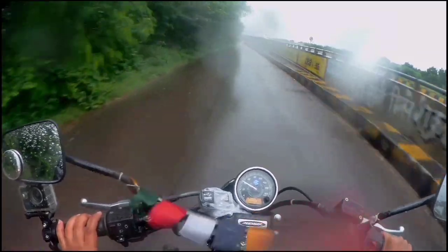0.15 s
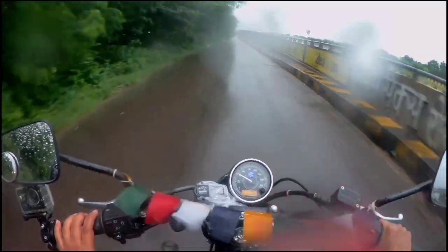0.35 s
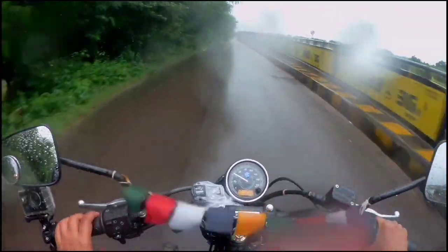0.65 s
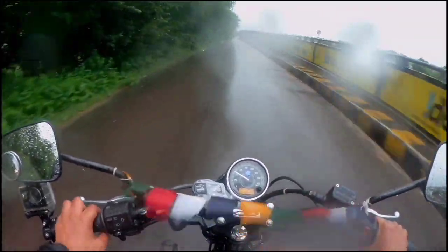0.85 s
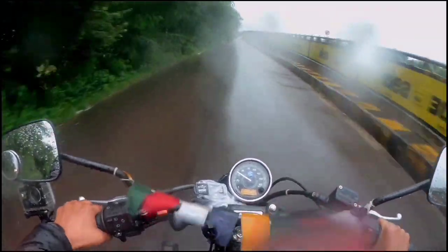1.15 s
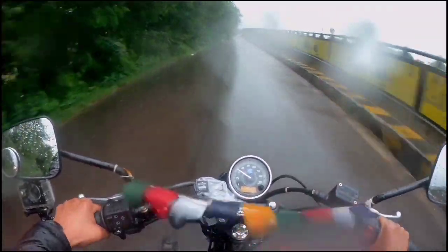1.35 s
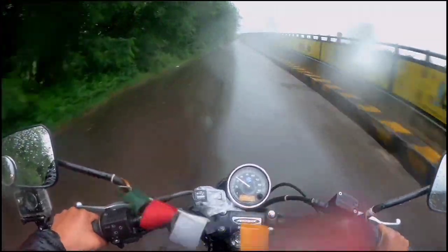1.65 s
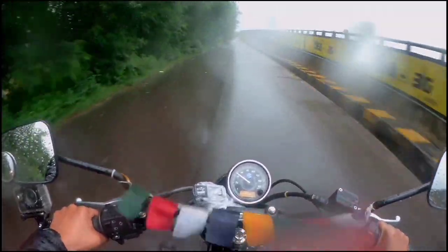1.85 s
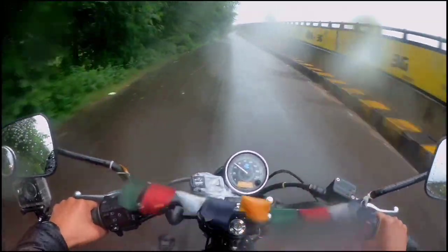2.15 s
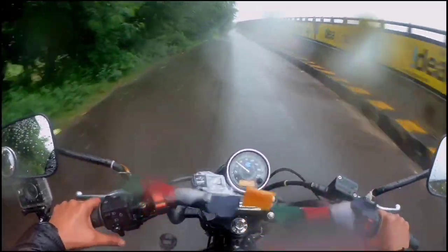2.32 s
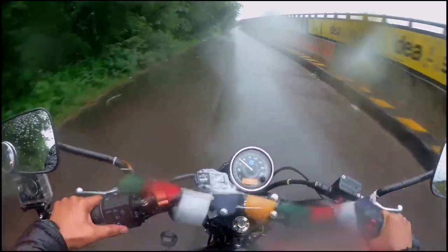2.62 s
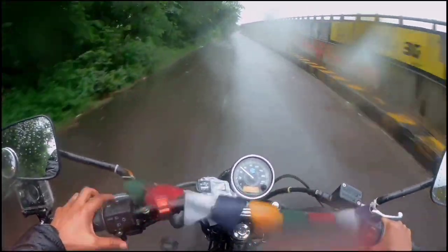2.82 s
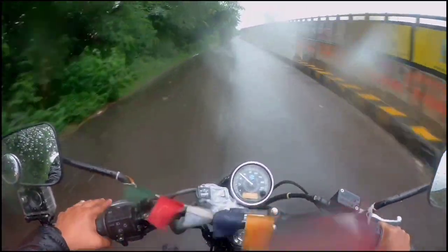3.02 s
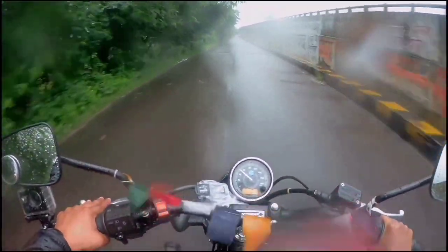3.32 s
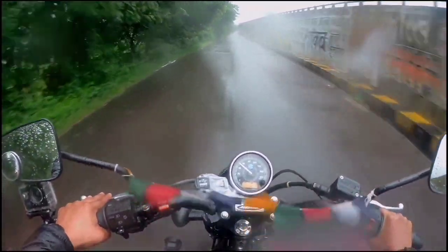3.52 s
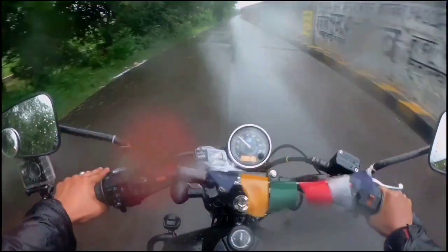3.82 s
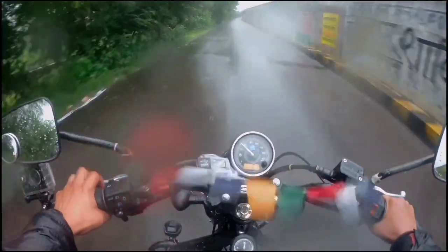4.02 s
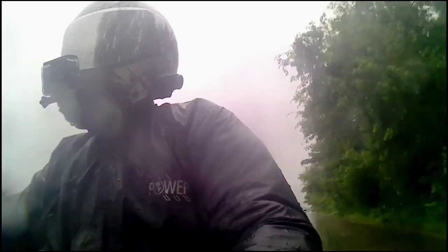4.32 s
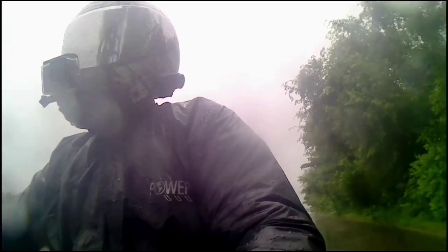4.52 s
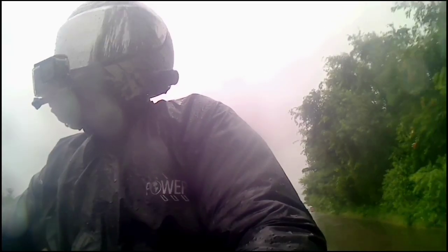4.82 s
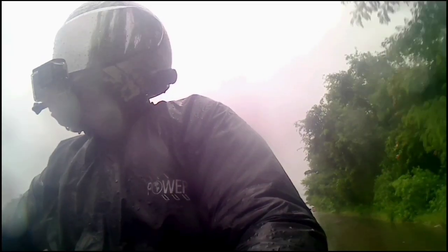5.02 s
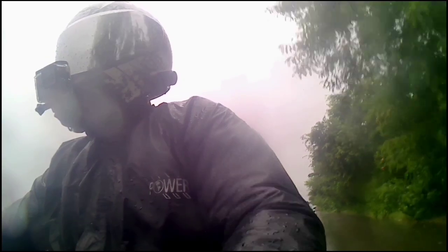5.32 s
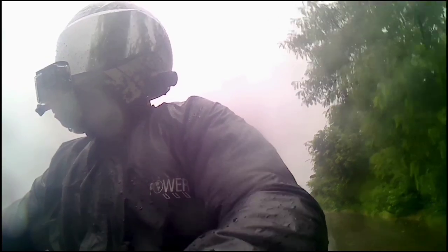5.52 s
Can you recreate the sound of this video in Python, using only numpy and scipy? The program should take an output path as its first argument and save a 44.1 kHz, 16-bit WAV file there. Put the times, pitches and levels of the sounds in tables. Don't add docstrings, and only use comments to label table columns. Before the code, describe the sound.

Dull, close onboard motorcycle sound: low throbbing engine, broad watery tyre rush and buffeting wind, while rain taps sharply on a plastic shell.

```python
import sys
import numpy as np
from scipy import signal
from scipy.fft import rfft, irfft, next_fast_len
from scipy.io import wavfile
from scipy.ndimage import uniform_filter1d

SR = 44100
rng = np.random.default_rng(int(sys.argv[2]) if len(sys.argv) > 2 else 0)


def wav_out(sig):
    wavfile.write(sys.argv[1], SR, np.round(np.clip(np.atleast_2d(sig).T, -1, 1) * 32767).astype(np.int16))


def decibels_to_gain(level_db):
    exponent = np.asarray(level_db, float) / 20
    return 10 ** exponent


N = 249898

# time in seconds, firings per second.
FIRING = [(0.0, 22.3), (0.5, 23.4), (1.0, 23.85), (1.5, 24.95), (2.1, 26.25), (2.6, 26.9), (3.0, 27.5),
          (3.5, 28.2), (3.9, 28.75), (4.3, 28.9), (4.45, 27.85), (5.4, 27.95), (5.67, 27.75)]
# time in seconds, exhaust level in dB.
THROTTLE = [
    (0, -42),
    (1, -41),
    (2, -38),
    (3, -38),
    (4.3, -37),
    (4.42, -45),
    (5.67, -44),
]
PORT_HZ = 6540


def in_time(rows):
    seconds, values = np.transpose(rows)
    return np.interp(np.arange(N) / SR, seconds, values)


def rms_one(x):
    return x / np.sqrt(np.mean(x ** 2) + 1e-20)


def drift(rate):
    r = np.exp(-80 * np.pi * rate / SR)
    white = rng.standard_normal(N // 40 + 2002)
    slow = signal.lfilter([1], [1, -2 * r, r * r], white)[2000:]
    return np.interp(np.arange(N) / 40, np.arange(len(slow)), rms_one(slow))


def ring(clicks, hz, t60):
    r = decibels_to_gain(-60 / (t60 * SR))
    w = 2 * np.pi * hz / SR
    return signal.lfilter([0, np.sin(w)], [1, -2 * r * np.cos(w), r * r], clicks + 1e-18)


def clicks_at(times, sizes):
    out = np.zeros(N)
    places = (np.asarray(times) * SR).astype(int)
    np.add.at(out, np.minimum(places, N - 1), sizes)
    return out


def banded_noise(spectrum, shared_db, own_db, rate, count=3):
    hz, level_db = np.transpose(spectrum)
    edges = np.geomspace(hz[0], hz[-1], int(count * np.log2(hz[-1] / hz[0])) + 2)
    together = drift(rate)
    white = rng.standard_normal((2, N + SR // 2))
    out = 0
    for k, (low, high) in enumerate(zip(edges, edges[1:])):
        sos = signal.butter(2, [low, high], "band", fs=SR, output="sos")
        band = signal.sosfilt(sos, white[k % 2])[-N:]
        band_db = np.interp(np.log(low * high) / 2, np.log(hz), level_db)
        out = out + band * decibels_to_gain(band_db + shared_db * together + own_db * drift(rate))
    return rms_one(out)


def far_rain_and_hiss():
    # frequency in Hz, level in dB per Hz.
    hiss_spectrum = [(5000, -9), (7500, -1), (9000, 1.5), (11000, 2.5), (13000, -0.5), (14500, -2),
                     (15600, -9)]
    return decibels_to_gain(-71) * banded_noise(hiss_spectrum, shared_db=.3, own_db=.45, rate=12, count=5)


def drizzle(per_s=900, spread_db=6.0, level_db=-62):
    sizes = decibels_to_gain(spread_db * np.minimum(rng.exponential(1, N), 3.2)) * rng.choice([-1, 1], N)
    born = rng.random(N) < per_s * decibels_to_gain(3.0 * drift(8)) / SR
    pitches = np.geomspace(1500, 9000, 14)
    dealt = rng.integers(0, 14, N)
    favour = 1 + 1.5 / (1 + ((pitches - 6500) / 600) ** 2)
    favour = favour + 1.5 / (1 + ((pitches - 3500) / 500) ** 2)
    rings = 0
    for k, hz in enumerate(pitches):
        mode = ring(sizes * born * (dealt == k), hz, 8.4 / hz)
        rings = rings + favour[k] * (hz / 2000) ** -1.6 * mode
    return decibels_to_gain(level_db) * np.convolve(rings, np.hanning(6) / 2.17)[:N]


HIT_DELAY_S = .0009


def strike(times, sizes, hz, t60, rise_s):
    t = np.arange(1200) / SR
    shape = decibels_to_gain(-60 * t / t60) * (1 - np.exp(-t / rise_s)) ** 2
    sines = np.sin(2 * np.pi * np.outer(hz * np.ones(len(times)), t))
    waves = np.outer(sizes, shape / shape.max()) * sines
    out = np.zeros(N + len(t) + SR)
    starts = ((times + HIT_DELAY_S) * SR).astype(int)
    np.add.at(out, starts[:, None] + np.arange(len(t)), waves)
    return out[:N]


def snaps(times, peak_db):
    train = clicks_at(times + HIT_DELAY_S, decibels_to_gain(peak_db))
    sos = signal.butter(2, 3000, "high", fs=SR, output="sos")
    return signal.sosfilt(sos, train + 1e-18 * rng.standard_normal(N))


def large_drops():
    # time in seconds, peak in dB, main mode in Hz, low mode in dB above the main.
    big_drops = [(.0643, -48, 3230, 9), (.1122, -47, 3340, 11), (.3451, -43, 3050, 9),
                 (.3641, -49, 3280, 12), (1.1303, -44.5, 3380, 8), (1.3364, -35, 3420, 7),
                 (1.4825, -46, 3200, -11), (1.505, -36.5, 3130, -12), (1.7818, -40.5, 3160, -4),
                 (2.0056, -49, 3230, 13), (2.1002, -37, 3030, 6), (2.779, -40.5, 3680, 7),
                 (2.9058, -44, 2950, -1), (2.9778, -35.5, 3130, 2), (3.0008, -41, 3500, 3),
                 (3.5487, -45, 3140, 9), (3.6122, -47, 3280, 13), (3.7864, -46.5, 3120, 2),
                 (4.3079, -37, 3680, 0), (4.341, -33.5, 2800, 0), (4.371, -48, 3000, 13),
                 (4.4244, -45, 3130, 0), (4.566, -44.5, 3380, 11), (4.7998, -43.5, 3980, 3),
                 (5.1803, -45, 3130, 9), (5.3002, -40.5, 3250, -11), (5.4314, -38, 3420, 9),
                 (5.582, -44, 3120, 10), (5.594, -38, 2970, 4), (5.6391, -44, 3180, 6)]
    # share of the main pitch, fall by 60 dB in seconds, level in dB.
    shell_modes = [(1.0, .007, -2.5), (1.37, .006, -12.5), (.78, .006, -7)]
    luck = rng.random((42, 4))
    middling = [luck[:, 0] * N / SR,
                -48.5 - 9 * luck[:, 1],
                3250 * (1 + .09 * (2 * luck[:, 2] - 1)),
                7 + 10 * (luck[:, 3] - .5)]
    s, peak_db, hz, low_db = np.hstack([np.transpose(big_drops), middling])
    place = rng.uniform(-1, 1, (len(s), 5))
    splat_s = .0003
    out = 0
    for k, (share, t60, db) in enumerate(shell_modes):
        mode_db = peak_db + db + 3 * place[:, k] * min(k, 1)
        mode_hz = hz * share * (1 + .05 * place[:, 3] * k)
        out = out + strike(s, decibels_to_gain(mode_db), mode_hz, t60, splat_s)
    low = np.sqrt(np.maximum(decibels_to_gain(peak_db + low_db) ** 2 - decibels_to_gain(-45.5) ** 2, 0))
    out = out + strike(s, low * decibels_to_gain(-3), 1800 + 150 * place[:, 4], .008, splat_s)
    extra_db = peak_db + 50
    out = out + strike(s, decibels_to_gain(-64 + .4 * extra_db), PORT_HZ, .0042, .00015)
    out = out + snaps(s, -61 + .2 * extra_db)
    return out - strike(s, decibels_to_gain(-55 + extra_db), 2200, .002, .00019)


def port_taps():
    # time in seconds, peak in dB.
    sharp_taps = [(.1156, -51), (.3366, -54), (.3641, -51), (.6345, -52), (.7552, -53), (.9462, -53),
                  (.9697, -47), (1.1303, -55), (1.3354, -49), (1.7988, -52), (2.2139, -51), (2.2922, -47),
                  (2.5735, -50), (2.9786, -54), (3.0001, -51), (3.0495, -52), (3.694, -53), (3.902, -54),
                  (4.0991, -49), (4.1265, -53), (4.1784, -52), (4.3093, -44.5), (4.3415, -52),
                  (4.4303, -51), (4.4802, -53), (4.5178, -51), (4.7207, -55), (4.7995, -49), (5.3012, -46),
                  (5.5943, -47)]
    s, peak_db = np.transpose(sharp_taps)
    air = strike(s, decibels_to_gain(peak_db + 3.0), PORT_HZ, .0028, .00017)
    wall = strike(s, decibels_to_gain(peak_db - 4), 5000, .0028, .0001)
    return air + snaps(s, peak_db - 17) + wall


def port_slaps():
    # time in seconds, peak in dB.
    water_slaps = [
        (4.3086, -54),
        (4.3409, -34),
        (4.371, -52),
        (4.3913, -40),
    ]
    s, peak_db = np.transpose(water_slaps)
    return snaps(s + .0008, peak_db + 9.5)


def shell_knocks():
    # time in seconds, peak in dB, pitch in Hz.
    heavy_knocks = [
        (3.282, -19, 1070),
        (4.31, -29, 1480),
        (4.3405, -25, 950),
        (4.8, -32, 1540),
        (5.094, -24, 830),
        (5.433, -24, 1240),
    ]
    s, peak_db, hz = np.transpose(heavy_knocks)
    knock = strike(s - .00045, decibels_to_gain(peak_db + 1.5), hz, .0045, .0005)
    return knock - strike(s - .0003, decibels_to_gain(peak_db - 10), 300, .005, .0003)


def wind():
    # frequency in Hz, level in dB per Hz.
    wind_spectrum = [(7.1, -33), (12, -5), (140, 1), (256, -2.5), (392, -11.5), (454, -10), (600, -15.5),
                     (780, -84), (1320, -120)]
    return banded_noise(wind_spectrum, shared_db=1.1, own_db=0.7, rate=10.2)


def port_noise():
    t60 = 1.4 / 1120
    white = rng.standard_normal(N)
    return rms_one(ring(ring(white, PORT_HZ, t60), PORT_HZ, t60))


def spray():
    # frequency in Hz, level in dB per Hz.
    spray_spectrum = [(2000, 10), (2600, 1), (3400, -5), (4300, -13.5), (5200, -15), (6500, -12.5),
                      (8000, -39), (9500, -29)]
    through_wall = banded_noise(spray_spectrum, shared_db=2.6, own_db=4.5, rate=28.0, count=4)
    return through_wall + decibels_to_gain(-7 + 1.05 * drift(27)) * port_noise()


def hum(firing):
    # pitch in Hz, width in Hz, level in dB above the roar, best speed in firings per second,
    # loss in dB for each firing per second off that speed.
    hollows = [(839, 35, -10, 24.26, 2.5), (715, 60, -6, 25.45, 4.5), (1155, 136, -9, 25.1, 2),
               (1637, 110, -17.5, 24, 1), (2250, 79, -19.5, 8.8, 7.2)]
    out = 0
    for hz, width, db, best, loss_db in hollows:
        white = rng.standard_normal(N)
        tone = rms_one(ring(ring(white, hz, 1.1 / width), hz, 1.1 / width))
        out = out + decibels_to_gain(db - loss_db * np.abs(firing - best) + 0.4 * drift(6.7)) * tone
    return out


def tyre_roar(firing):
    # frequency in Hz, level in dB per Hz.
    roar_spectrum = [(200, -8), (300, -2), (480, -8), (620, -10), (780, -11), (930, -13.5), (1300, -15),
                     (1500, -21), (1850, -26), (2500, -33.5), (3500, -44), (4500, -60.5)]
    return banded_noise(roar_spectrum, shared_db=0.1, own_db=1.08, rate=1.56, count=5) + hum(firing)


def throb(turns):
    depth = np.interp(np.arange(N) / SR, [0, 2, 4.3, 4.45], [1.3, 1.0, .7, .3])
    return np.cos(2 * np.pi * (turns - .42)) * depth


def engine(turns, throttle_db, uneven_db=1.0, baffles_s=(.0031, .0047, .0069), scatter=.6, travel_s=.011):
    # pitch in Hz, width in Hz, level in dB.
    pipe_modes = [(110, 50, -4), (160, 60, -4), (225, 70, -1), (290, 70, -1), (370, 90, -7), (480, 90, -8),
                  (600, 110, -14), (720, 110, -13), (850, 110, -16), (1150, 200, -24)]
    fired = np.flatnonzero(np.diff(np.floor(turns)))
    pulses = clicks_at(fired / SR + travel_s, decibels_to_gain(uneven_db * rng.standard_normal(len(fired))))
    pipe = 0
    for k, (hz, width, db) in enumerate(pipe_modes):
        pipe = pipe + (-1) ** k * decibels_to_gain(db) * np.sqrt(width) * ring(pulses, hz, 2.2 / width)
    size = next_fast_len(N + SR // 4)
    delays = np.exp(-2j * np.pi * np.outer(baffles_s, np.fft.rfftfreq(size, 1 / SR)))
    smear = np.prod((delays - scatter) / (1 - scatter * delays), axis=0)
    pipe = irfft(rfft(pipe, size) * smear, size)[:N]
    return decibels_to_gain(throttle_db) * rms_one(pipe)


def scene():
    # time in seconds, wind level in dB.
    gusts = [(0.0, -34), (0.11, -34), (0.28, -37), (1.75, -33.5), (1.86, -32.5), (2.51, -33.5), (2.56, -31),
             (3.19, -34), (3.58, -29), (3.63, -34.5), (3.85, -29), (4.18, -35), (4.4, -25.5), (4.42, -30.5),
             (4.89, -32), (5.43, -31), (5.56, -27.5), (5.67, -31.5)]
    firing, throttle_db, wind_db = in_time(FIRING), in_time(THROTTLE), in_time(gusts)
    turns = np.cumsum(firing) / SR
    faster = firing - 26.5
    gust_db = wind_db - wind_db.mean()
    load_db = throttle_db - throttle_db.mean()

    rain = drizzle() + large_drops() + port_taps() + port_slaps() + shell_knocks()
    spray_db = -63.5 + 0.04 * faster + 0.2 * gust_db
    roar_db = -37.5 + 0.39 * faster + .05 * gust_db + 0.18 * load_db
    mix = far_rain_and_hiss() + rain
    mix = mix + decibels_to_gain(wind_db + 0.03) * wind()
    mix = mix + decibels_to_gain(spray_db) * spray()
    mix = mix + decibels_to_gain(roar_db + 1.07 * throb(turns)) * tyre_roar(firing)
    return (mix + engine(turns, throttle_db))[None]


def lose_treble(x):
    # start in seconds, end in seconds.
    treble_lost = [
        (0, .017),
        (3.249, 3.315),
    ]
    t = np.arange(N) / SR
    lost = sum((t >= a) & (t < b) for a, b in treble_lost)
    lost = uniform_filter1d(lost.astype(float), size=200, mode="nearest")
    narrow = signal.sosfiltfilt(signal.ellip(8, .1, 50, 8600, fs=SR, output="sos"), x)
    return x + lost * (narrow - x)


def thin_treble(x):
    # frequency in Hz, share from 0 to 1.
    empty_share = [(7500, 0), (9000, .015), (12000, .02), (12600, .17), (15500, .22)]
    hz, _, frames = signal.stft(x, SR, nperseg=1024)
    lumps = rng.random((len(hz) // 6 + 1, frames.shape[-1]))
    lumps = uniform_filter1d(lumps, size=4, axis=1)
    rank = lumps.ravel().argsort().argsort().reshape(lumps.shape) / lumps.size
    share = np.interp(hz, *np.transpose(empty_share))
    empty = np.repeat(rank, 6, axis=0)[:len(hz)] < share[:, None]
    treble = np.sum(np.abs(frames[0, hz > 9000]) ** 2, axis=0)
    empty = empty & (treble < 2 * np.median(treble))
    return signal.istft(frames * np.where(empty, decibels_to_gain(-22), 1), SR, nperseg=1024)[1][..., :N]


def top_cut(x):
    return signal.sosfilt(signal.butter(12, 15390, fs=SR, output="sos"), x)


def record(dry):
    mix = signal.sosfilt(signal.butter(2, 14, "high", fs=SR, output="sos"), dry)
    mix = signal.sosfilt(signal.ellip(8, .1, 50, 15450, fs=SR, output="sos"), mix)
    mix = thin_treble(lose_treble(mix))
    left_s = (N - np.arange(N)) / SR
    mix = mix * np.minimum(1, left_s / .004 + .1)
    return top_cut(mix)


dry = scene()
out = record(dry)
wav_out(out)
```